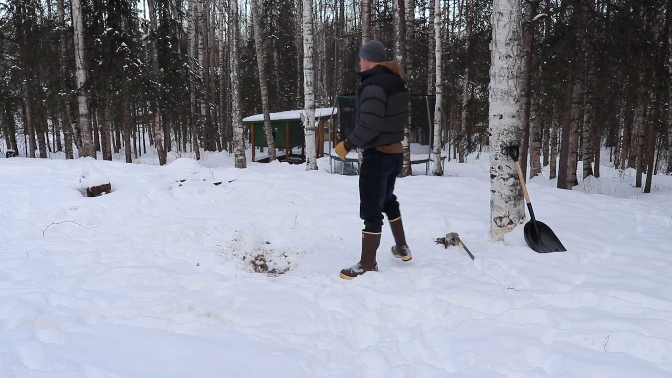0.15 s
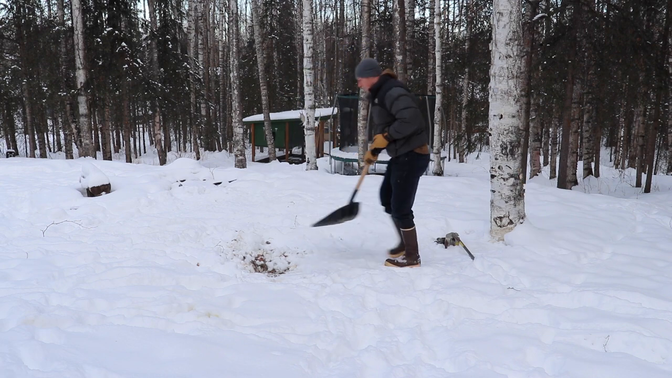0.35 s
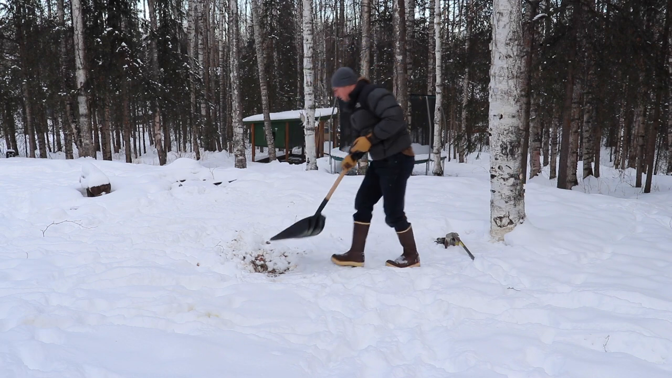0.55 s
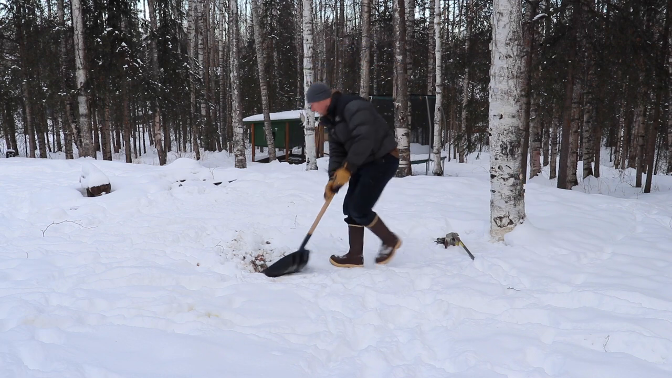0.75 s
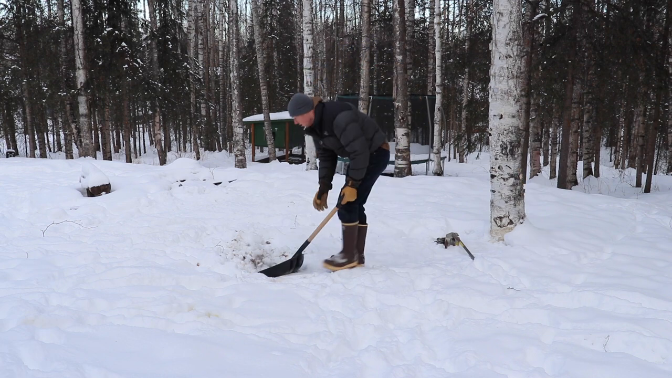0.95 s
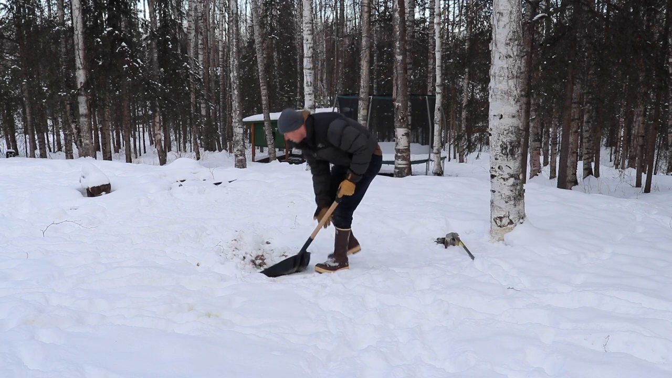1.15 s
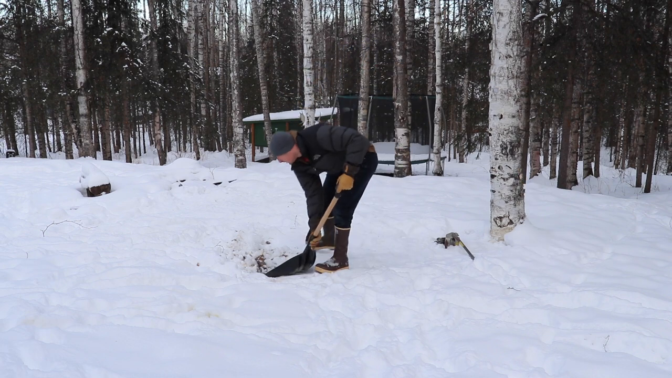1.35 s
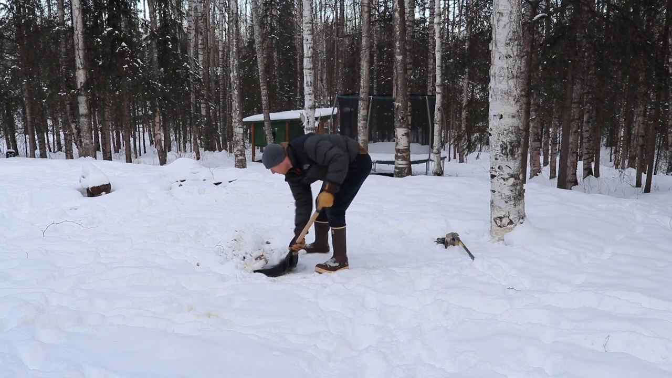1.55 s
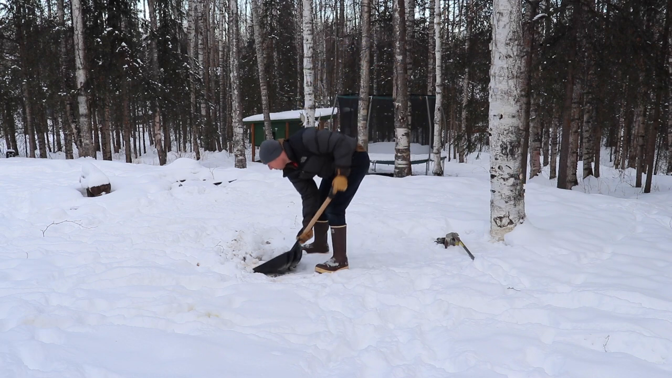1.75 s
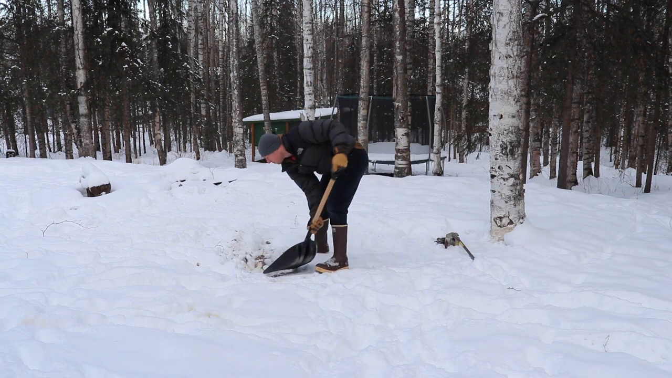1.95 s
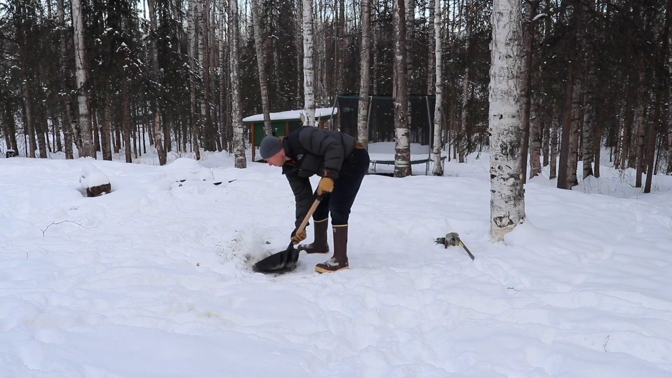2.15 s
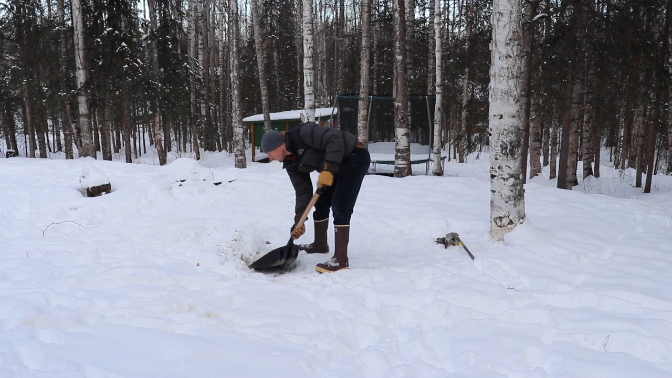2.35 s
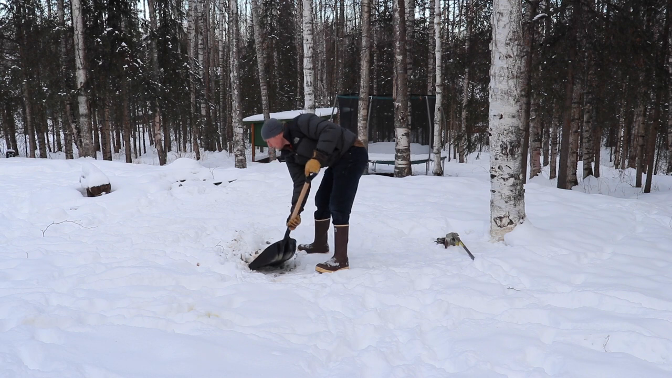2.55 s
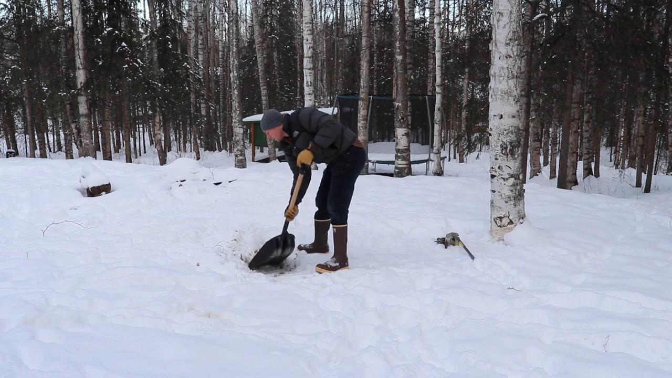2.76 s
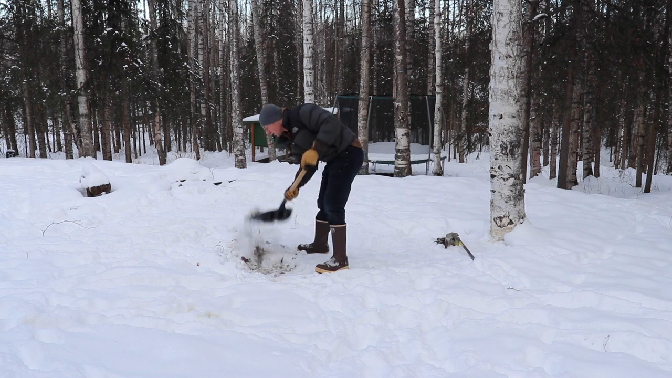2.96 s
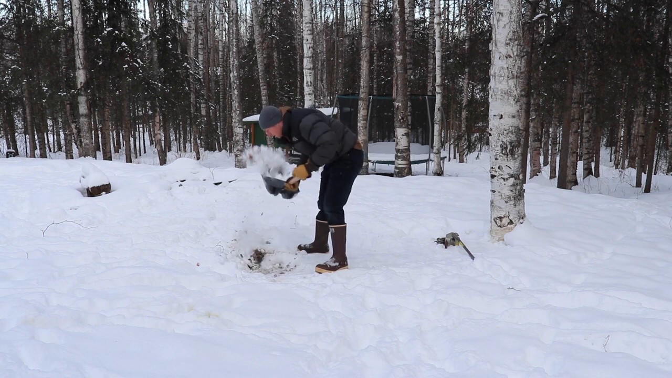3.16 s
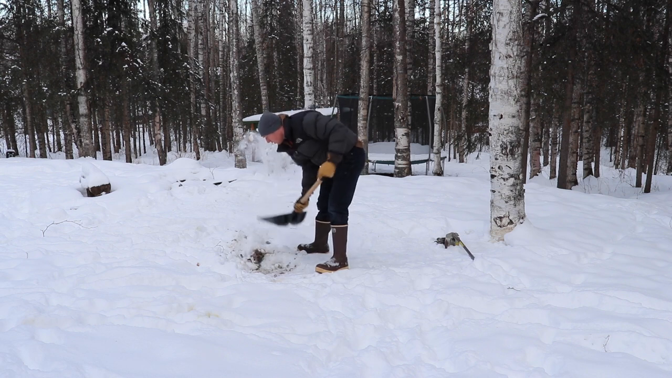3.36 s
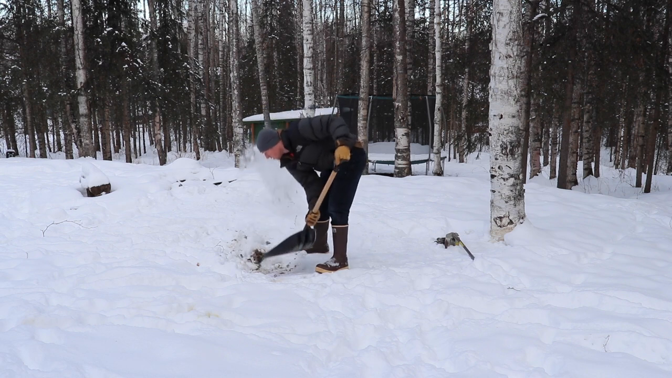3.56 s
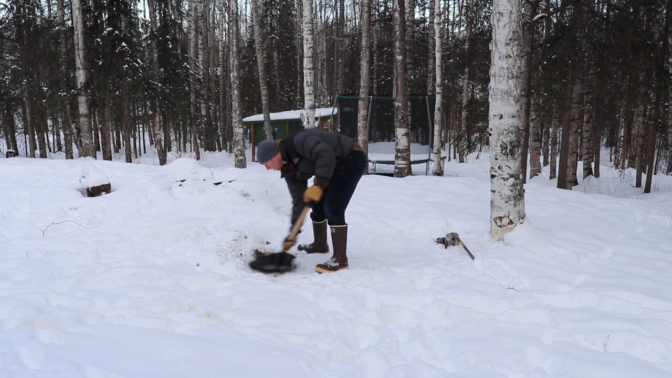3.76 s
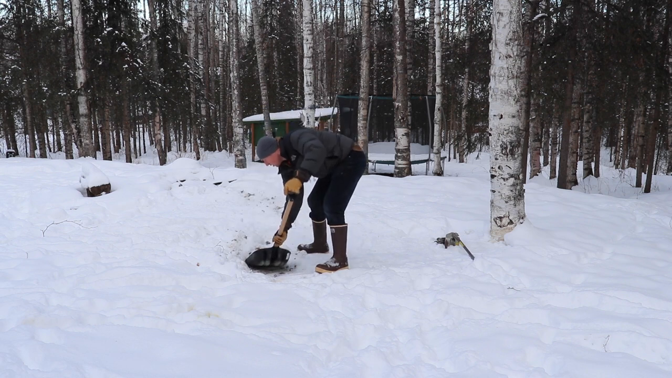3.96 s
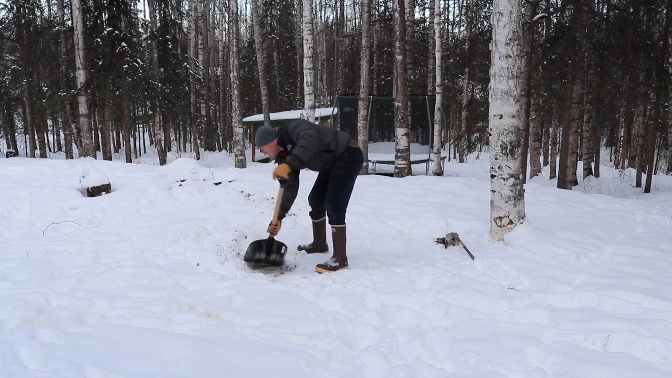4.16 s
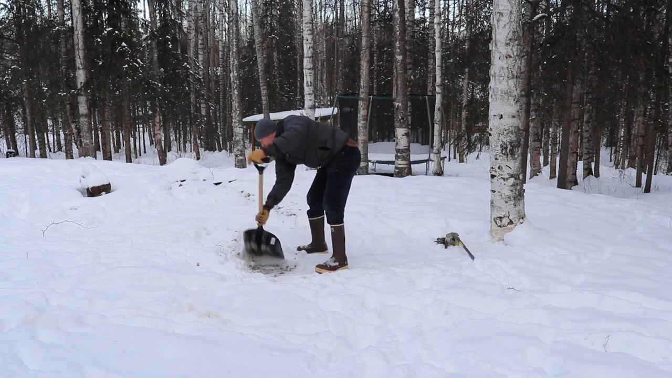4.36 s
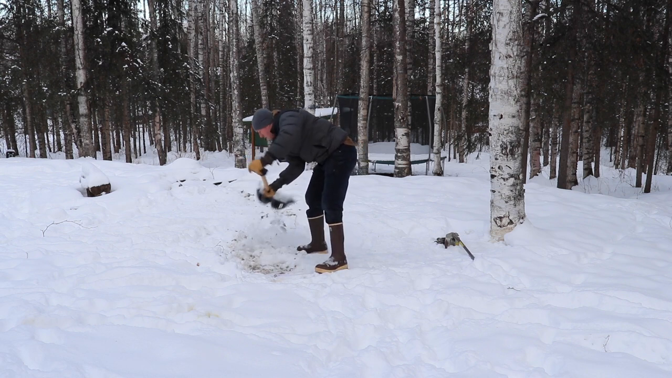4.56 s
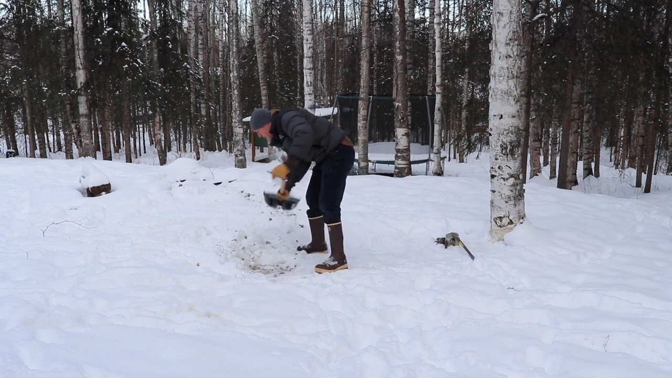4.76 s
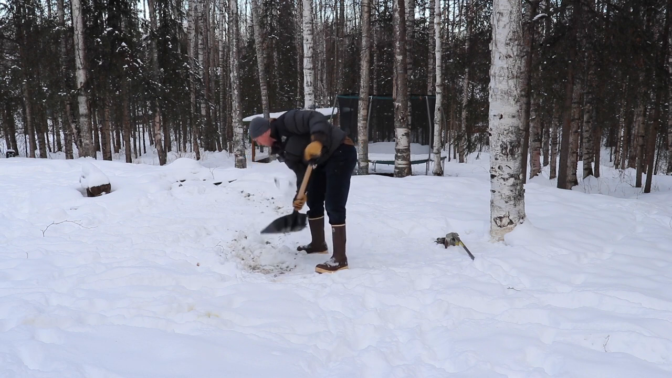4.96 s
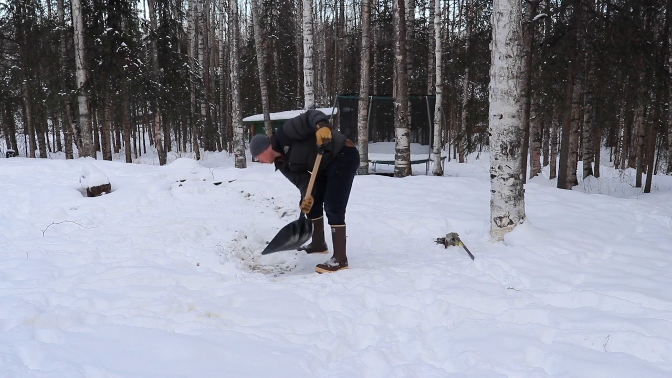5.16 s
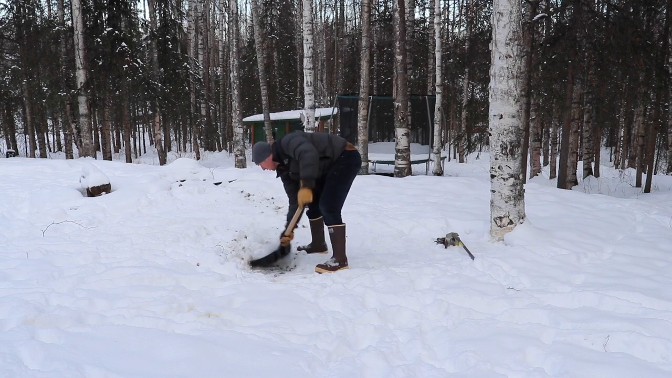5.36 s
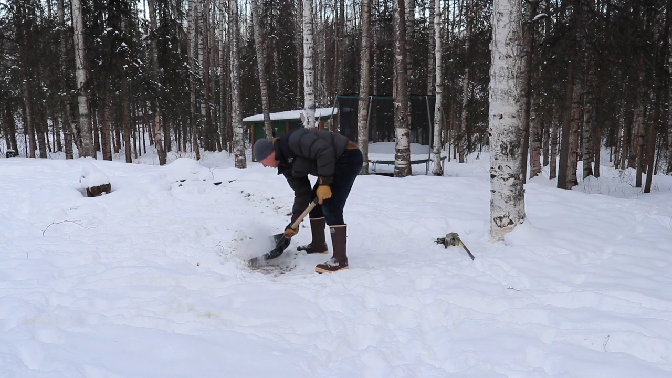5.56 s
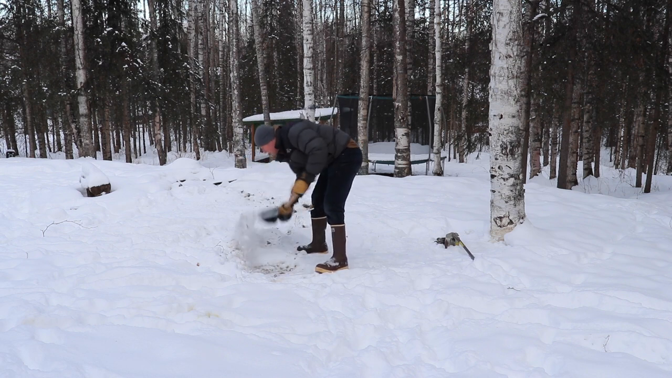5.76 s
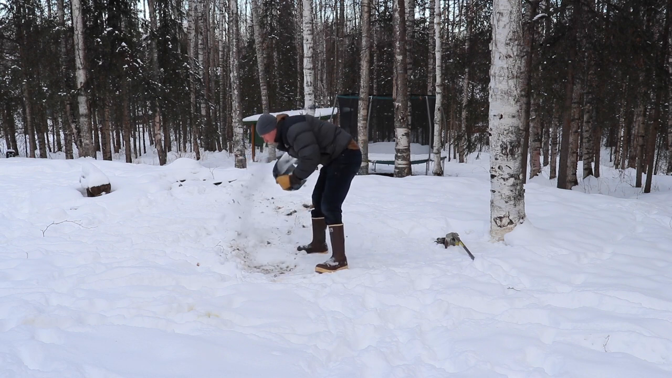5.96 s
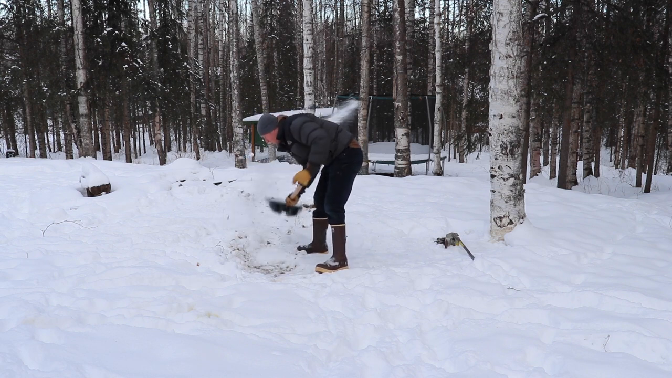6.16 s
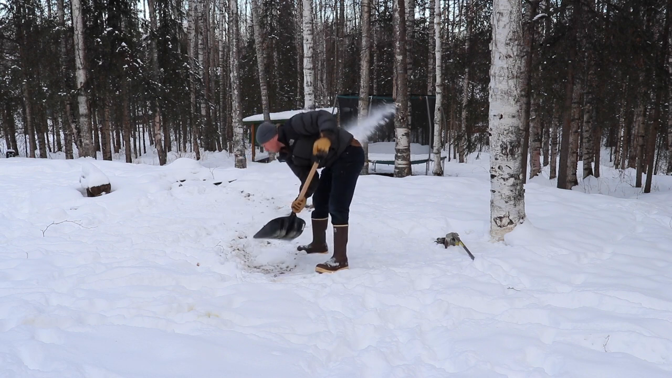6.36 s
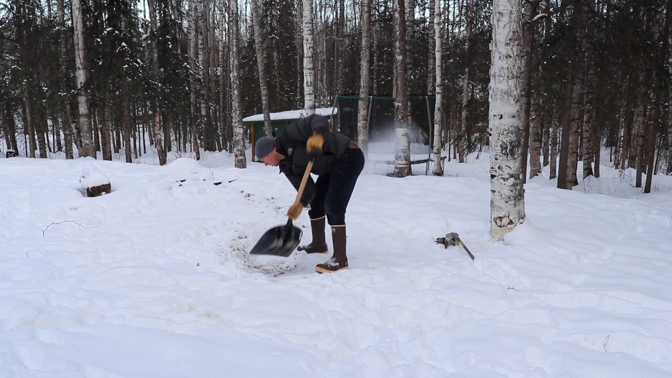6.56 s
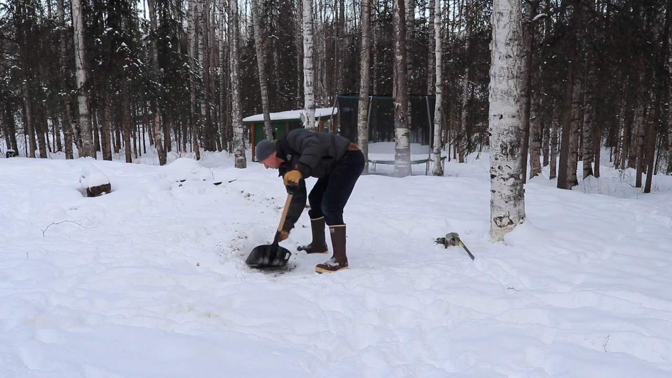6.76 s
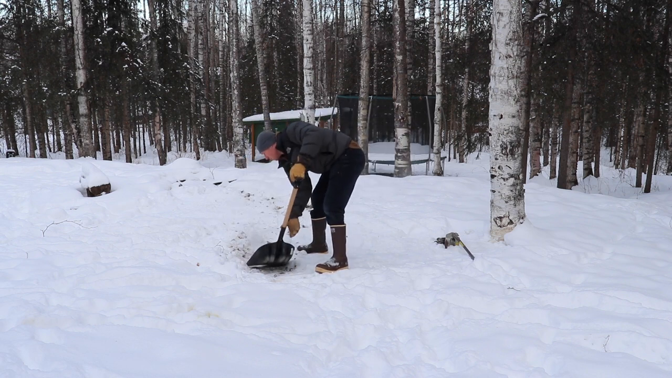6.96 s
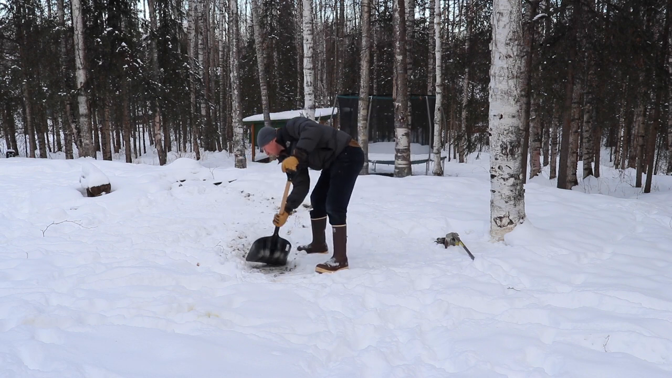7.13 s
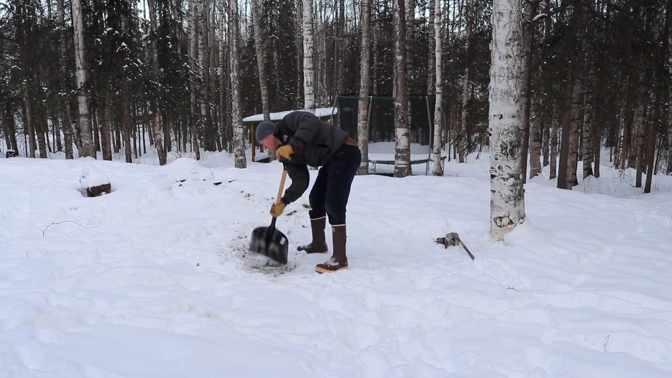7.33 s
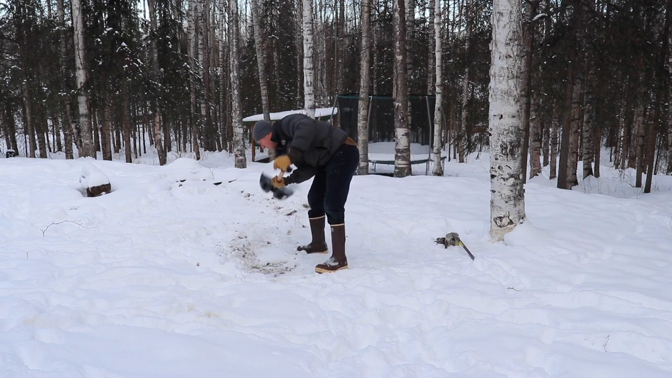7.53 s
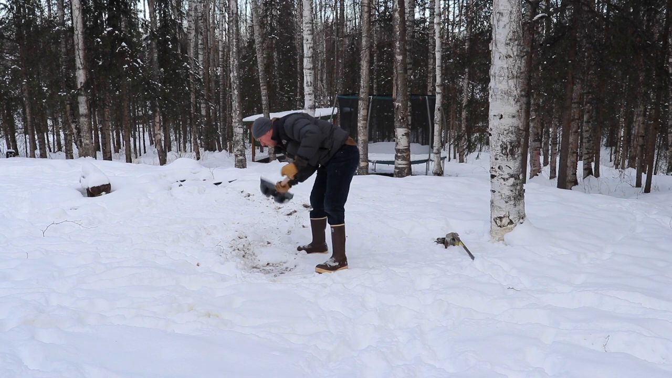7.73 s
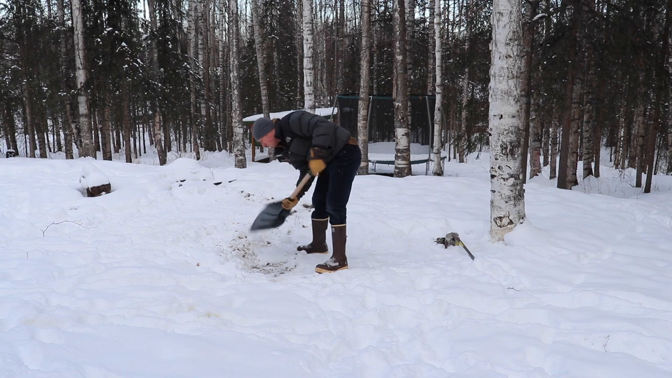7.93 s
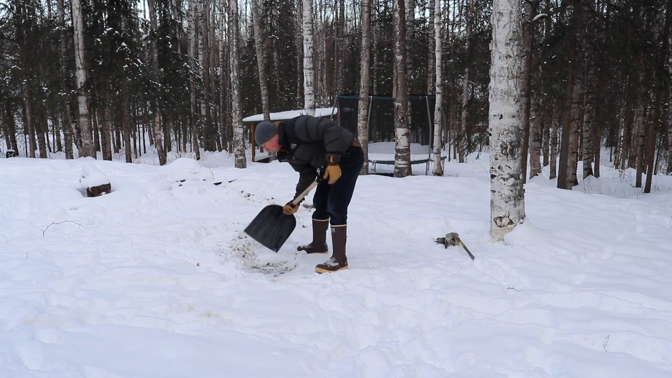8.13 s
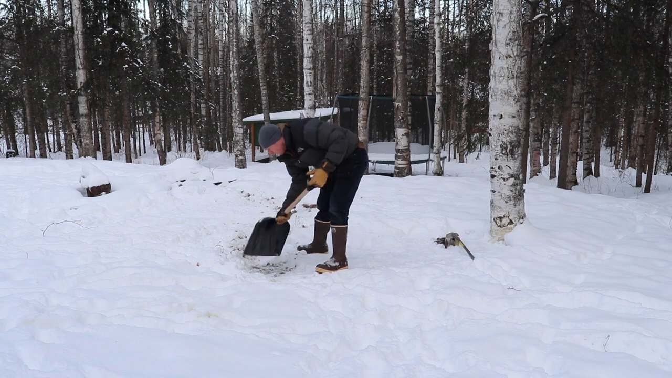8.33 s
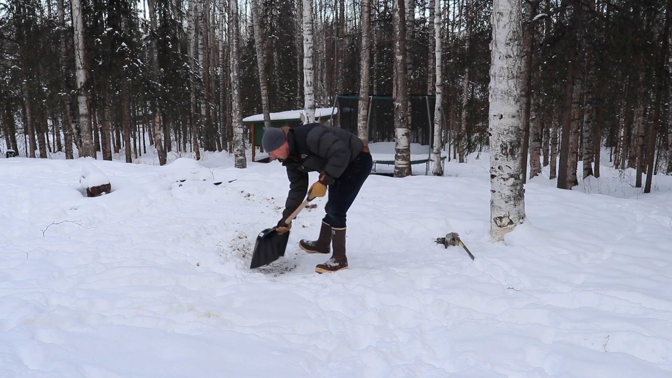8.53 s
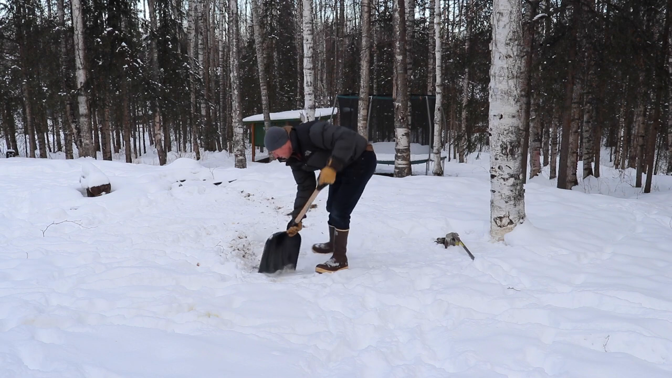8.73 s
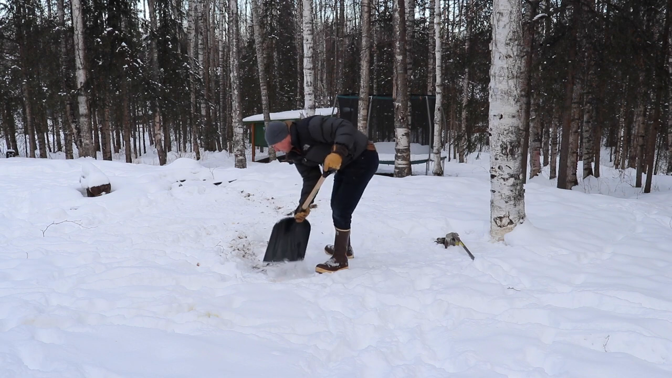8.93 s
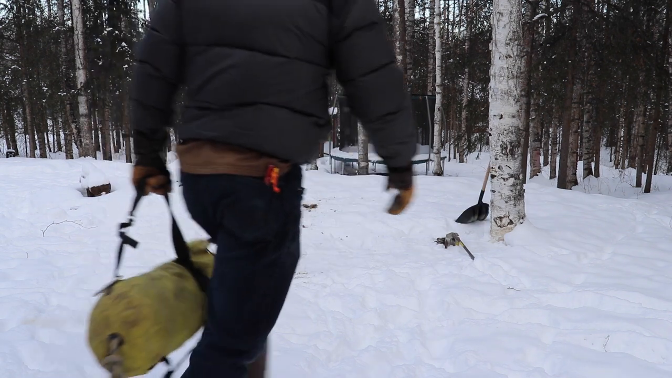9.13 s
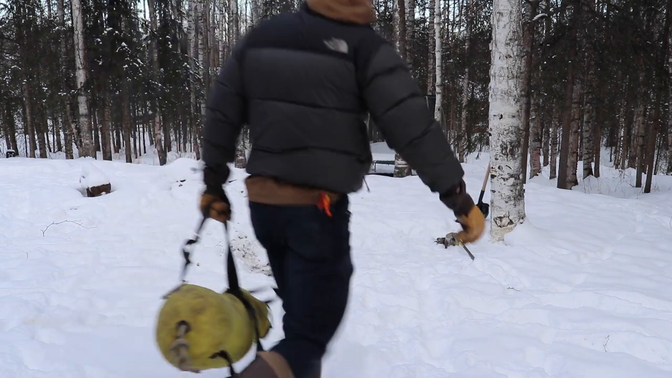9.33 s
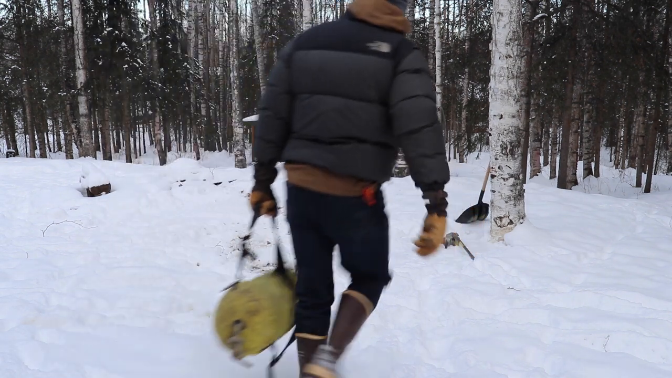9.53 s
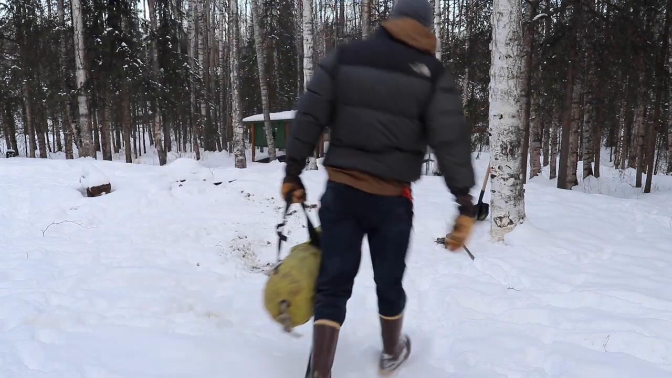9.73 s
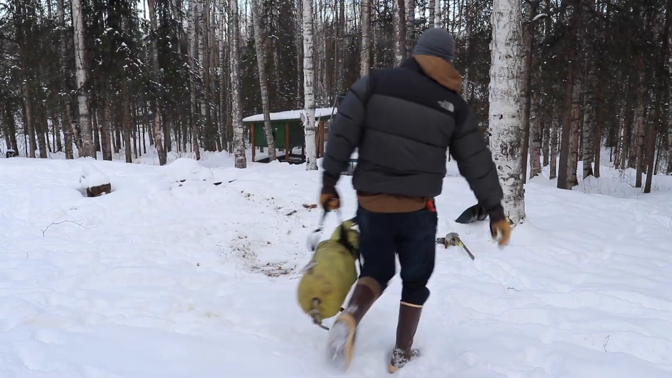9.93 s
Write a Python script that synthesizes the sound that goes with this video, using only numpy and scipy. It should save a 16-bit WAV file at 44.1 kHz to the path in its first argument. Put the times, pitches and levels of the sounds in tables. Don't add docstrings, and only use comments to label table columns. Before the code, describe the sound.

Harsh crunching and scraping of a hollow plastic scoop in icy snow, sharp crust cracks, soft snow spills, and finally close heavy footsteps on packed snow.

```python
import sys
import numpy as np
from scipy import signal
from scipy.fft import rfft, irfft
from scipy.io import wavfile
from scipy.ndimage import uniform_filter1d

SR = 44100
rng = np.random.default_rng(int(sys.argv[2]) if len(sys.argv) > 2 else 0)


def voltage_ratio(level):
    return 10 ** (np.asarray(level, float) / 20)


def master_out(mix):
    frames = np.transpose(np.atleast_2d(mix))
    ceiling = np.clip(frames, -1, 1)
    pcm = np.round(ceiling * 32767).astype(np.int16)
    wavfile.write(sys.argv[1], SR, pcm)


N = 440559

# pitch_hz, level_db (per Hz)
SNOW_TONE = [(35, -52), (60, -29), (122, -12.5), (206, -13.5), (291, -8), (472, -8), (793, -1), (1080, -2),
             (1470, 1.5), (3000, -0.5), (6000, -1.5), (15000, -14)]
# pitch_hz, level_db (per Hz)
SOLE_TONE = [(30, -44), (60, -15.5), (120, 0.5), (250, 0), (500, 3), (900, -2.5), (1500, -5), (3000, -11.5),
             (6000, -19), (15000, -31)]
# pitch_hz, level_db (per Hz)
FOREST_TONE = [(30, -16), (80, -14), (160, -12), (270, -6), (500, -9.5), (900, -14), (1400, -21.5),
               (3000, -28), (8000, -35.5), (15500, -36)]
# pitch_hz, level_db
MICROPHONE_TONE = [(5000, -1.5), (6700, -1), (8200, 8), (9300, 1.5), (10800, -5), (12800, 3), (14500, 2),
                   (15700, -9)]

# pitch_hz, width_hz, level_db
BOWL_MODES = [(385.4, 24, -1.5), (607.6, 30, -6.5), (780, 50, -4)]
# pitch_hz, width_hz, level_db
EDGE_MODES = [(1252.7, 46, -1), (1464.6, 28.7, -4), (1750, 21, -8), (1962, 23, -4.5), (2796, 194, -9.5),
              (4520, 67, -22)]
RANGE_BORDERS = 260, 782.6, 4212
# time_s, bowl_db, edge_db
RINGING = [(.8, -9, -1.5), (1.5, 0, -1), (2.2, -2.5, -1), (3.0, 0, -7.5), (4.2, 1, 2.5), (5.8, -1, -0.5),
           (6.799, 4.5, -4.5), (7.3, 2, -1.5), (7.75, 5, 1), (8.5, 2.5, -2.5), (8.68, 5, -3), (8.78, -4, 4),
           (8.95, -2, 4), (9.06, 2, -2)]

# start_s, crushing_db, time_to_fall_60_db_s, fine_db (over crushing), flexing_db (over crushing)
JOLTS = [(1.04, -29, .4, 3.5, -6), (7.197, -18, .2, 0, -4), (1.787, -18.5, 0.1, -3, 0.5),
         (2.078, -15, 0.1026, -10, -16), (2.467, -21.5, 0.03, -7.5, -19.5), (2.674, -24, 0.2635, -5, 2.5),
         (2.795, -22.5, 0.02, 0.5, -4), (2.822, -17, .3, -6, -10), (2.984, -12.5, 0.0262, -10, -15.5),
         (3.855, -13, 0.1618, -3, -9), (3.999, -16.5, 0.004, 0, -20.5), (4.081, -22.5, 0.16, 1, -3),
         (1.603, -19.5, .4, -4.5, -8), (5.437, -5, .08, 4, -11), (5.45, -17.5, 0.3842, 0.5, -10),
         (5.593, -23, 0.23, -2, -6.5), (5.853, -21, 0.1459, 0.5, -13.5), (6.763, -12, .1, 3, -12),
         (6.772, -11, .075, -3, -8), (7.143, -22, 0.34, -3, -1.5), (7.324, -15, .05, -6, -12),
         (8.316, -17, .28, -3, -8)]
# top_s, crushing_db, time_to_fall_60_db_s, fine_db (over crushing), flexing_db (over crushing)
SPILLS = [(1.44, -22, .8, -3, -11), (1.89, -19.5, .3, -3, -12), (1.965, -23, .2, -4, -14),
          (3.02, -25.5, .95, -3, -10), (4.188, -20.5, 0.6725, -1.5, -9), (4.66, -32, .75, -2.5, -5.5),
          (4.9, -50.5, 2, -5, 0.5), (5.88, -31, .85, 2.5, -4), (6.818, -32.5, 0.66, -4, -2.5),
          (4.86, -38, .12, -4, -10), (7.67, -33, 1.2, -5, -5.5)]
# start_s, held_s, crushing_db, fine_db (over crushing), flexing_db (over crushing)
DRIVES = [(.844, .07, -19.5, -1.5, -8), (3.785, .05, -50, 12, -10), (1.256, .05, -25, -4, -7),
          (2.053, .085, -25, 0, -4), (2.141, .07, -17, -1.5, -8), (6.943, .04, -20.5, 0, -8),
          (7.358, .05, -28, 0, -3), (8.532, .145, -21.5, 1.5, -8.5), (8.72, .022, -18.5, -.5, -4),
          (1.575, .015, -26, 0, -8), (1.792, .018, -22, -1, -6), (1.398, .04, -26, -5, -12)]
# full_pressure_s, held_s, crushing_db, fine_db (over crushing), flexing_db (over crushing)
PUSHES = [(1.16, 0.081, -32.5, -4.5, 0.5), (1.334, 0.0041, -24.5, -4, 2.5), (1.655, .055, -18, -2, -8),
          (3.41, .03, -47.5, 1.5, -6), (3.9, .17, -32.5, 0.5, -3), (4.52, 0.1254, -32, -1, -11),
          (5.235, .01, -52, 8.5, -8), (6.4, 0.081, -60.5, 7.5, -5), (6.93, .012, -34, 3, -6),
          (7.01, .055, -25.5, -3, -1.5), (7.575, .08, -35, -4, -6), (6.015, .04, -39, 4, -6),
          (7.23, .045, -24, -2.5, -6), (8.47, .03, -27.5, -1.5, -4.5), (8.79, 0.1737, -20.5, -2, -7)]
# full_pressure_s, held_s, crushing_db, fine_db (over crushing), flexing_db (over crushing)
LIFTS = [(.93, .045, -22, -3, -7), (1.047, .012, -21, -1, -4), (1.08, .01, -23, 1, -6),
         (2.28, .315, -31, -2.5, -4), (2.6, .06, -36, -2, 1), (2.92, .055, -19.5, -3, -19),
         (4.395, .11, -18.5, 1.5, -16), (5.716, 0.1198, -17.5, -1.5, -10.5), (7.43, .05, -16, -1.5, -14),
         (7.48, .035, -23, -3, -8), (8.99, 0.0679, -30, -8, 2.5)]

# start_s, peak_db, fine_db (over peak), knock_db (over peak)
BOWL_CRACKS = [(1.0472, -4, -12, -5.5), (1.16, -9, -15, -4), (1.259, -13, -6.5, -8),
               (1.331, -11.5, -21.5, -13.5), (1.7846, -11.5, -13.5, -15.5), (2.053, -16.5, -4.5, -10),
               (2.696, -14.5, -16, -12.5), (4.0386, -7.5, -10, -6.5), (4.079, -1.5, -12, 0),
               (4.36, -15.5, -11, -13.5), (6.7652, -8, -4, -9), (6.778, -12, -12, 6),
               (6.8164, -11, -16, -10), (6.958, -8, -12, -11), (7.0594, -12, -14, -15.5),
               (7.1417, -14.5, -11.5, -7.5), (7.1993, -7, -13, -11), (7.322, -11, -8, -8),
               (7.3579, -10, -5, -13), (8.4578, -9, -2, -9.5), (8.5058, -14, -6.5, -3.5),
               (8.7692, -2, -5.5, -15), (8.8538, -3, -2.5, -15)]
# start_s, peak_db, fine_db (over peak)
BLADE_CRACKS = [(1.4367, -7.5, -30), (1.4905, -9.5, -10.5), (1.6, 0, -21), (1.855, -10.5, -13),
                (2.0747, -1.5, -5.5), (2.1417, 4, -9.5), (2.467, -7.5, -6.5), (2.6715, -13.5, -7),
                (2.7258, -9.5, -10), (2.792, -14, -5.5), (2.8222, -16, -12), (2.843, -10.5, -13),
                (3.0103, -11, -11), (3.9153, -8.5, -4.5), (3.9544, -15, -2), (3.985, -14, -3),
                (6.934, -15, -6), (4.262, -8.5, -9.5), (4.531, -9.5, -10), (5.4341, -1.5, 0.5),
                (5.5904, -7, -21), (5.687, -11.5, -13), (5.7057, -17, -14.5), (7.4327, -13, 4.5),
                (8.686, -10, -11.5), (8.7293, -3, -10.5)]
# start_s, peak_db, fine_db (over peak)
SMALL_CRACKS = [(0.8614, -3, -7), (1.2306, -21, -7), (1.3947, -14, -7), (1.5763, -13, -7), (1.948, -10, -7),
                (2.3825, -16, -7), (2.4039, -17, -7), (2.4518, -11, -7), (2.5094, -20, -7),
                (2.5586, -17, -7), (2.5875, -12, -7), (2.612, -22, -7), (2.6309, -22, -7),
                (2.7064, -19, -7), (2.8744, -9, -7), (2.9038, 0, -7), (2.9274, -3, -7), (2.9627, -4, -7),
                (4.1624, -8, -7), (4.2293, -8, -7), (4.6369, -14, -7), (4.8564, -19, -7), (5.8224, -4, -7),
                (7.0379, -8, -7), (7.1127, -21, -7), (7.2325, -12, -7), (7.4514, -2, -7), (8.3394, -5, -7),
                (8.4337, -16, -7), (8.4774, -14, -7), (8.6058, -3, -7), (8.6218, -4, -7), (8.6632, -4, -7),
                (8.8228, -7, -7), (8.9194, -7, -7), (8.9855, -12, -7)]
# start_s, peak_db, fine_db (over peak)
EDGE_CRACKS = [(.8416, 3, -24.5), (.8985, -10, -15), (1.0847, -9, -4), (1.6292, -4, -12),
               (1.8853, -6.5, -26), (1.9673, -4.5, -17), (2.8885, -8, -7), (2.916, -3, -5),
               (2.983, -14.5, -21.5), (3.8518, 8, -7), (3.9987, -3, -6), (4.132, -18, 3), (4.1477, -2, -13),
               (4.191, -14.5, -14), (4.395, 1, -29), (4.8496, -17.5, -30.5), (7.4008, -9.5, -7.5),
               (8.3142, -4, -5.5), (8.5363, 5.5, -12), (8.573, 6.5, -17.5)]

# start_s, held_s, level_db, pitch_hz
SINGING = [(1.33, .03, -30, 740), (1.45, .04, -30, 760), (2.85, .13, -33, 385), (2.9, .08, -27, 1300),
           (4.4, .1, -26, 1850), (5.72, .11, -27, 1480), (6.776, .018, -24, 380), (6.96, .09, -35, 385),
           (7.145, .02, -33, 760), (7.2, .025, -28, 610), (7.41, .08, -29, 1440), (7.63, .07, -42, 2070),
           (7.65, .14, -41, 800), (8.545, .15, -29, 780), (8.735, .015, -24, 740), (8.77, .2, -26, 1490),
           (8.78, .19, -28, 1270), (8.8, .06, -30, 385), (8.98, .08, -33, 400)]
# start_s, held_s, level_db
THUDS = [(.62, .1, -50), (1.05, .05, -43), (1.6, .1, -42), (2.14, .07, -45), (3.86, .02, -42),
         (4.08, .03, -39), (5.437, .015, -37), (5.8, .04, -51), (6.77, .03, -40), (8.32, .04, -43),
         (8.57, .03, -47), (8.8, .15, -39)]
# start_s, peak_db, pitch_hz
TICKS = [(0.8428, 3, 2620), (0.863, -8, 2286), (1.6037, -12, 1520), (2.3598, -16, 1710), (2.587, -16, 1750),
         (2.6723, -13.5, 1750), (2.694, -12, 1740), (2.9275, -5, 1800), (2.9827, -5, 1750),
         (3.8466, -2.5, 1790), (4.8572, -16, 2300), (3.8478, -9, 11000), (3.9981, -4.5, 2080),
         (4.6376, -8, 2820), (5.239, -25.5, 8480), (6.45, -34, 5000), (6.4717, -28, 4800),
         (7.3251, 3, 2950), (8.5725, 0, 1560)]
# start_s, peak_db, pitch_hz
CRUMBS = [(6.113, -36, 12000), (6.155, -38, 12500), (6.188, -38, 8400), (6.219, -38, 13500),
          (6.329, -38, 8080), (6.348, -38, 4600), (6.451, -34, 13000), (6.462, -35, 13300),
          (6.472, -31, 8560), (6.506, -37, 5500), (6.517, -36, 8300), (6.557, -39, 14500),
          (6.593, -37, 12000), (4.852, -22, 2200)]

# full_weight_s, held_s, packing_db, crystals_db (over packing)
STEPS = [(.44, 0.0276, -43, -0.5), (0.539, 0.0035, -40.5, 4), (.592, 0.0615, -39.5, 3),
         (0.724, 0.086, -31, 1), (9.108, 0.0114, -43, 3), (9.16, .115, -36, 2), (9.375, .02, -32, 0),
         (9.42, 0.0126, -18, -3), (9.46, 0.0437, -26, -1.5), (9.56, .06, -39, 0), (9.63, .022, -32, -0.5),
         (9.69, .08, -32, -.5), (9.805, .02, -39, 0), (9.856, 0.0294, -35.5, 4.5), (9.918, 0.0089, -22, -4),
         (9.94, .05, -26, -3)]
# start_s, peak_db, crystals_db (over peak), pitch_hz
LUMPS = [(0.457, -29, -1.5, 285), (0.525, -33.5, 0.5, 694), (0.585, -34, -8.5, 673),
         (0.721, -27.5, -7.5, 654), (1.152, -24, -30, 140), (1.195, -26, -30, 180), (1.237, -21, -30, 230),
         (9.079, -22, -28, 579), (9.099, -21, -17, 413), (9.116, -16, -19.5, 742), (9.215, -24, -20, 520),
         (9.264, -20, -21.5, 574), (9.276, -20, -20, 500), (9.305, -18.5, -12, 141.5),
         (9.343, -18.5, -10, 142.7), (9.396, -15.5, -19.5, 423), (9.412, -8, -25, 568),
         (9.431, -21.5, -11.5, 364), (9.45, -13.5, -16.5, 157), (9.469, -16, -18.5, 511),
         (9.499, -34.5, -19.5, 681), (9.563, -26.5, -11, 113.5), (9.627, -17, -24, 634),
         (9.676, -19, -21, 642), (9.7, -26, -20, 150), (9.752, -25, -20, 170), (9.769, -27, -21, 150),
         (9.857, -11, -7, 422.8), (9.875, -23, 9, 420), (9.919, -12, -12, 430), (9.945, -22, -15, 450),
         (9.972, -21.5, -15, 519)]


def scraping():
    crush, fine, flex = effort()
    grip = np.clip(crush / voltage_ratio(-29.5), .2, 1)
    thud = voltage_ratio(-29) * np.sqrt(crush * flex)
    levels = np.array([thud, flex, crush, voltage_ratio(0.5) * fine])
    together_db = 1.29 * walk(45)
    alone_db = np.array([3.9 * walk(19), 2.62 * walk(25), 0.69 * walk(60), 1.7 * walk(40)])
    levels *= voltage_ratio(grip * (together_db + alone_db))
    force = snaps(rate=260, spread_db=2.4, tail_s=.0013, bed_db=.8)
    force += voltage_ratio(-6.0) * grip * chips(rate=60, spread_db=2.5, cycles=7.84, count=14)
    return shovel(force, *levels)


def effort():
    jam, swell = 7000, 190
    ease, free = 280, 1000

    def dying(rows, rise):
        return [(s, 0, db, rise, 60 / t60, *rel) for s, db, t60, *rel in rows]

    def held(rows, rise, fall):
        return [(s, hold, db, rise, fall, *rel) for s, hold, db, *rel in rows]

    contacts = dying(JOLTS, jam) + dying(SPILLS, swell)
    contacts += held(DRIVES, jam, ease) + held(PUSHES, swell, ease) + held(LIFTS, swell, free)
    return press(*np.transpose(contacts))


def cracking():
    blade_knock_db, edge_knock_db = -20, -27.5
    rows = list(BOWL_CRACKS)
    rows += [(*row, blade_knock_db) for row in BLADE_CRACKS]
    rows += [(s, db - 3.5, fine_db, blade_knock_db) for s, db, fine_db in SMALL_CRACKS]
    rows += [(*row, edge_knock_db) for row in EDGE_CRACKS]
    s, db, fine_db, knock_db = np.transpose(rows)
    thud = burst(s, db - 33, 0.0024, 0.09)
    knock = burst(s, db + knock_db - 6, 0.0014, 0.028)
    crack = burst(s, db - 11, 0.00018, 0.01252)
    crack += burst(s, db - 13, 0.0024, 0.0537)
    fine = burst(s, db + fine_db - 3.5, .0001, 0.01796)
    fine += burst(s, db + fine_db - 10.0, 0.00064, 0.017)
    force = snaps(rate=500, spread_db=-1.5, tail_s=0.0019, bed_db=-3.5)
    return shovel(force, thud, knock, crack, fine)


def shovel(force, thud, flex, crush, fine):
    return split(colour(force, SNOW_TONE), *RANGE_BORDERS) * np.array([thud, flex, crush, fine])


def scoop(thud, bowl, crust, crystals):
    s, bowl_db, edge_db = np.transpose(RINGING)
    time = np.arange(N) / SR
    bowl = resonate(bowl, BOWL_MODES, np.interp(time, s, bowl_db))
    crust = resonate(crust, EDGE_MODES, np.interp(time, s, edge_db))
    return thud + voltage_ratio(-2) * bowl + crust + crystals


def resonate(x, modes, free_db):
    drift = .012
    out = x.copy()
    for hz, width, db in modes:
        turn = np.exp(2j * np.pi * np.cumsum(hz * (1 + drift * walk(3.5))) / SR)
        pole = np.exp(-np.pi * width / SR)
        driven = x * voltage_ratio(free_db + 1.8 * walk(8.1)) * turn.conj()
        out += 2 * voltage_ratio(db) * np.real(turn * signal.lfilter([1 - pole], [1, -pole], driven))
    return out


def singing(rise_db_s=2200, fall_db_s=600, sharpness=28):
    out = np.zeros(N + SR)
    t = np.arange(SR // 2) / SR - .05
    for s, held, db, hz in SINGING:
        tone = unit(ring(rng.standard_normal(SR), hz, hz / sharpness)[SR // 2:])
        level_db = db + rise_db_s * np.minimum(t, 0) - fall_db_s * np.maximum(t - held, 0)
        start = int((s + t[0]) * SR)
        out[start:start + len(t)] += tone * voltage_ratio(level_db)
    return out[:N]


def ground():
    band = signal.butter(2, [75, 220], "band", fs=SR)
    low = unit(signal.lfilter(*band, rng.standard_normal(N)))
    return press(*np.transpose(THUDS), 900, 330)[0] * low


def grit():
    s, db, hz = np.transpose(TICKS)
    ticks = knocks(s, db - .7, hz, cycles=1.1)
    s, db, hz = np.transpose(CRUMBS)
    return ticks + knocks(s, db - 3, hz, cycles=5.5)


def boots():
    grains = snaps(rate=220, spread_db=1.6, tail_s=0.00235, bed_db=-1.5)
    low, high = split(colour(grains, SOLE_TONE), 1217)
    s, held, db, crisp_db = np.transpose(STEPS)
    pack, crisp = press(s, held, db, 348, 449.5, crisp_db) * voltage_ratio(1.46 * walk(30) - 5)
    s, db, crisp_db, hz = np.transpose(LUMPS)
    pack += burst(s, db - 9, 0.00162, 0.0348)
    crisp += burst(s, db + crisp_db, 0.000466, 0.01145)
    return pack * low + crisp * high + knocks(s, db - 5.5, hz, cycles=1.7)


def trees(x, t60=.35, wet_db=-22, top_hz=3500):
    t = np.arange(SR // 2) / SR
    fade_in = np.clip((t - .012) / 0.018, 0, 1)
    tail = rng.standard_normal(len(t)) * np.exp(-np.log(1000) * t / t60) * fade_in
    tail = signal.lfilter(*signal.butter(1, top_hz, fs=SR), tail)
    tail /= np.sqrt(np.sum(tail ** 2))
    return x + voltage_ratio(wet_db) * signal.fftconvolve(x, tail)[:N]


def forest():
    level_db = -47.5 + 1.3 * walk(1.372) + 0.28 * walk(7.2)
    return voltage_ratio(level_db) * unit(colour(rng.standard_normal(N), FOREST_TONE))


def snaps(rate, spread_db, tail_s, bed_db):
    when, size = rng.random(N), rng.exponential(size=N)
    power = (when < rate / SR) * voltage_ratio(2 * spread_db * np.minimum(size, 4))
    power = signal.lfilter([1], [1, -np.exp(-1 / (tail_s * SR))], power)
    power = power / power.mean() + voltage_ratio(2 * bed_db)
    return unit(np.sqrt(power) * rng.standard_normal(N))


def chips(rate, spread_db, cycles, count):
    out = np.zeros(N)
    for hz in np.geomspace(400, 6000, count):
        size = np.minimum(rng.exponential(size=N), 3)
        clicks = (rng.random(N) < rate / SR) * voltage_ratio(spread_db * size)
        clicks *= np.sign(rng.standard_normal(N))
        out += ring(clicks, hz, hz / cycles) * np.sqrt(cycles / hz)
    return unit(colour(out, [(400, -2), (6000, 9)]))


def press(s, held, db, rise_db_s, fall_db_s, *rel_db):
    t = np.arange(0, N / SR, .0005)[:, None]
    rise = rise_db_s * np.maximum(s - t, 0)
    fall = fall_db_s * np.maximum(t - s - held, 0)
    power = voltage_ratio(2 * (db - rise - fall))
    time = np.arange(N) / SR
    return np.sqrt([np.interp(time, t[:, 0], power @ voltage_ratio(2 * c)) for c in (0 * s, *rel_db)])


def burst(times, peaks_db, rise, t60):
    kicks = np.zeros(N)
    kicks[(times * SR).astype(int)] = voltage_ratio(peaks_db)
    t = np.arange(SR // 4) / SR
    shape = (1 - np.exp(-t / rise)) * np.exp(-np.log(1000) * t / t60)
    return signal.fftconvolve(kicks, shape)[:N]


def knocks(times, peaks_db, pitches_hz, cycles):
    t, out = np.arange(SR // 10) / SR, np.zeros(N + SR)
    for start, size, hz in zip((times * SR).astype(int), voltage_ratio(peaks_db), pitches_hz):
        out[start:start + len(t)] += size * np.sin(2 * np.pi * hz * t) * np.exp(-hz * t / cycles)
    return out[:N]


def ring(x, hz, width):
    return signal.lfilter(*signal.iirpeak(hz, hz / width, SR), x)


def split(x, *edges_hz):
    lows = [signal.lfilter(*signal.butter(2, hz, fs=SR), x) for hz in edges_hz]
    return np.array([unit(band) for band in np.diff([0 * x, *lows, x], axis=0)])


def colour(x, points):
    hz, db = np.transpose(points)
    grid = np.fft.rfftfreq(4096, 1 / SR)
    log_gain = np.interp(np.log(grid + 1), np.log(hz), db) * np.log(10) / 20
    ceps = irfft(log_gain)
    ceps[1:2048] *= 2
    ceps[2049:] = 0
    return signal.fftconvolve(x, irfft(np.exp(rfft(ceps))))[:N]


def walk(rate):
    k = int(SR / rate)
    steps = np.repeat(rng.standard_normal(N // k + 1), k)
    return uniform_filter1d(steps, k // 2 + 1)[:N]


def unit(x):
    return x / np.sqrt(np.mean(x ** 2))


def scene():
    digging = scoop(*(scraping() + cracking())) + singing() + ground() + grit()
    return (trees(digging + boots()) + forest())[None]


def low_pass(x):
    return signal.sosfilt(signal.butter(12, 15660, fs=SR, output="sos"), x)


def record(dry):
    x = colour(dry[0], MICROPHONE_TONE)
    x += voltage_ratio(-64.5) * rng.standard_normal(N)
    x = signal.lfilter(*signal.butter(2, 42, "high", fs=SR), x)
    x = np.clip(x, -.98, .98)
    return low_pass(x[None])


dry = scene()
out = record(dry)
master_out(out)
```